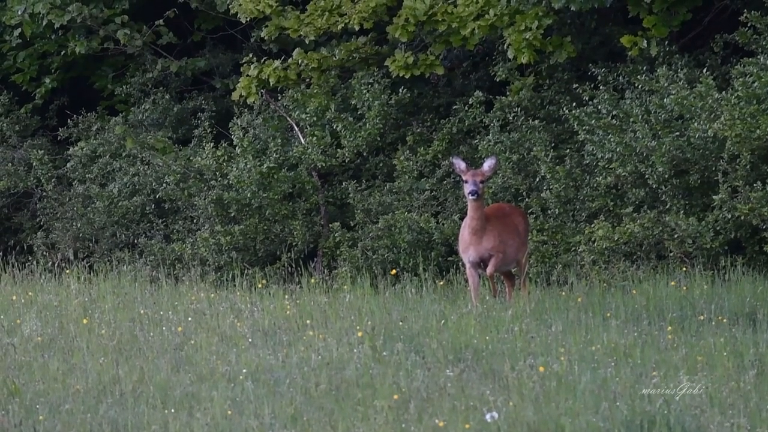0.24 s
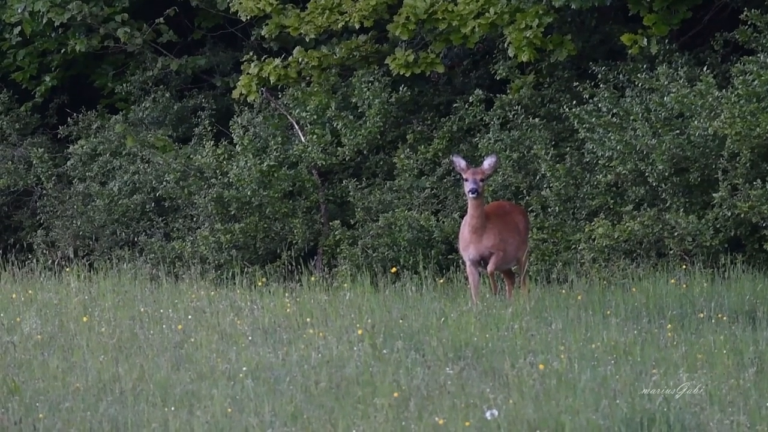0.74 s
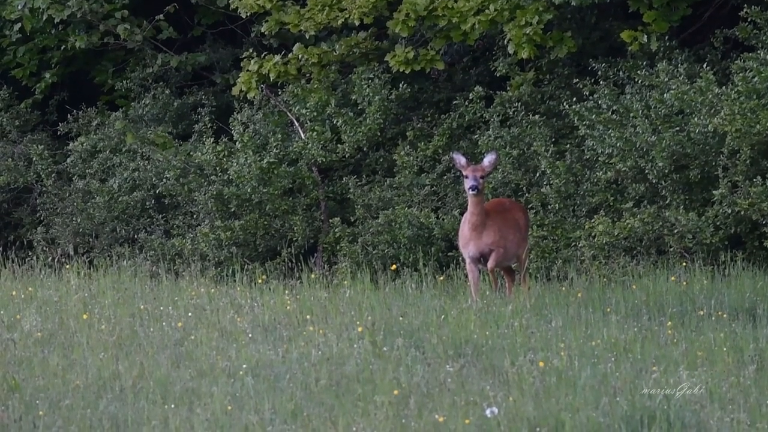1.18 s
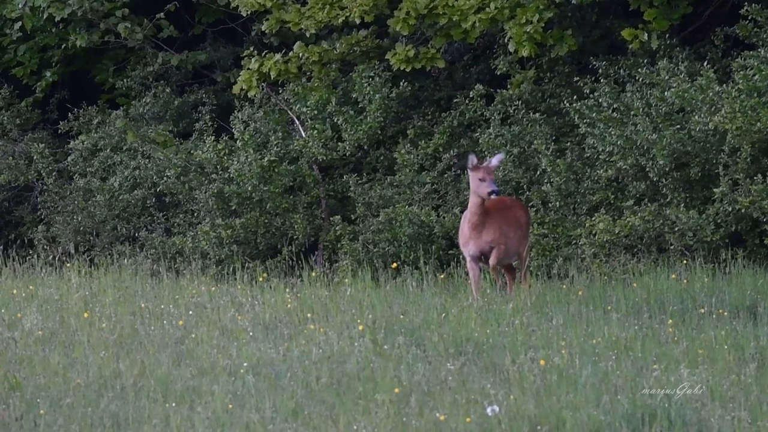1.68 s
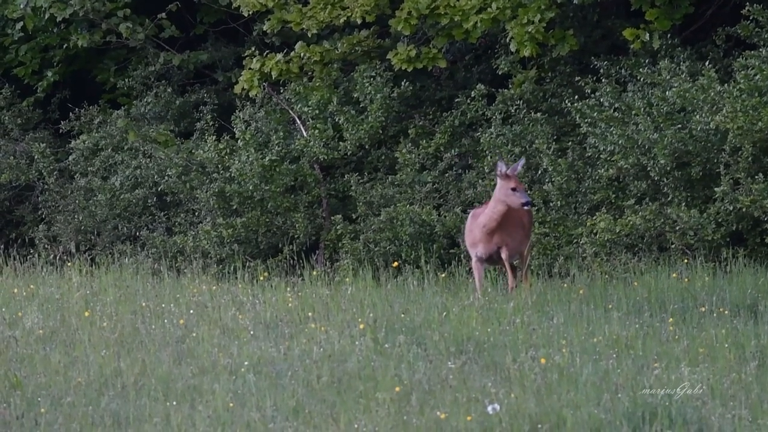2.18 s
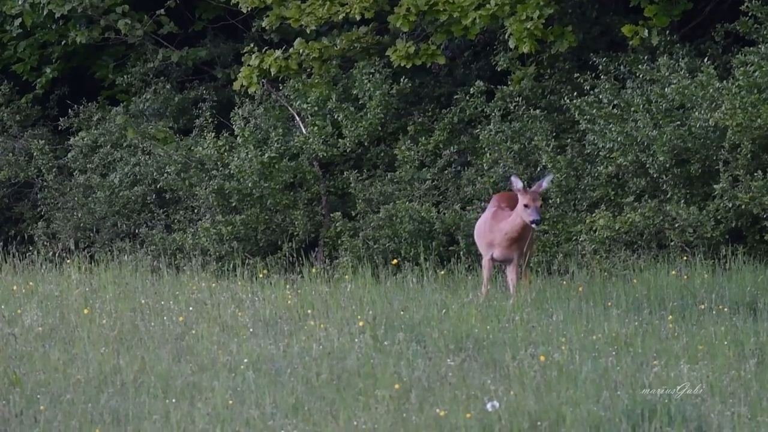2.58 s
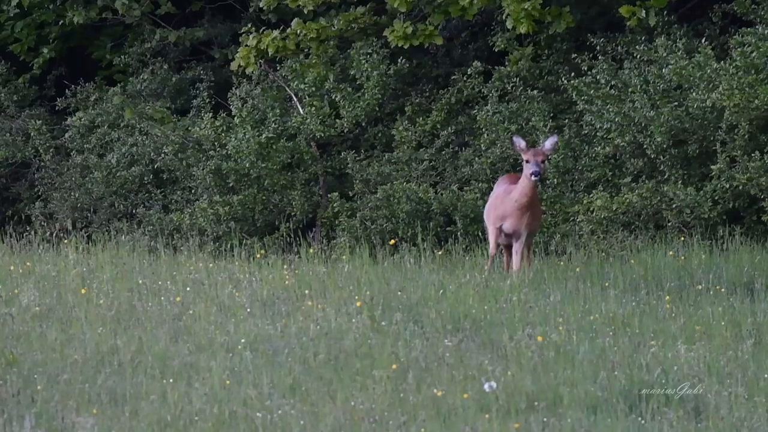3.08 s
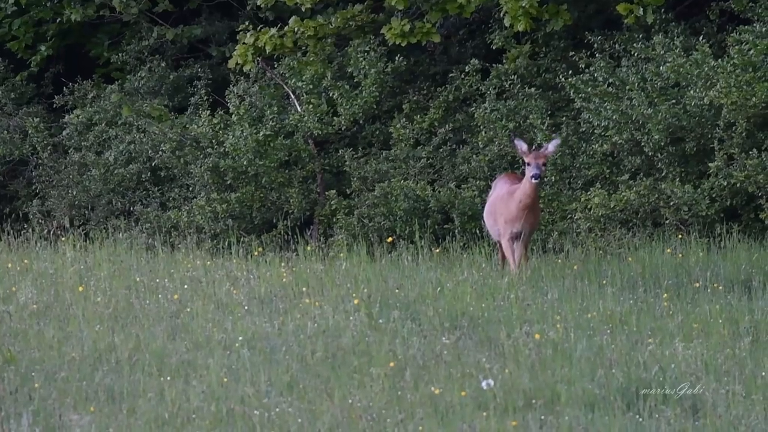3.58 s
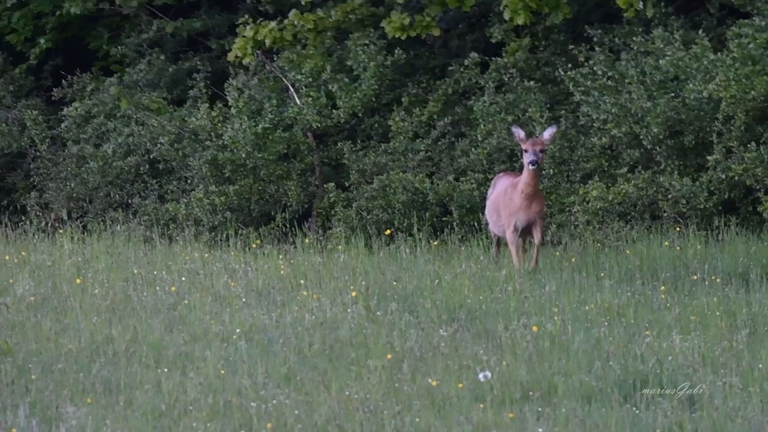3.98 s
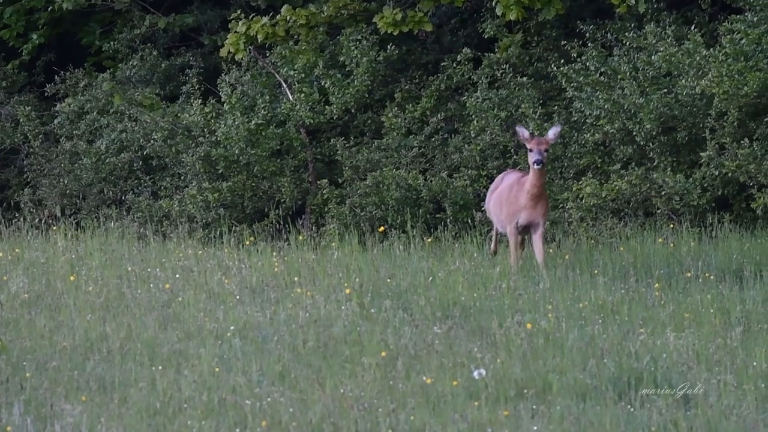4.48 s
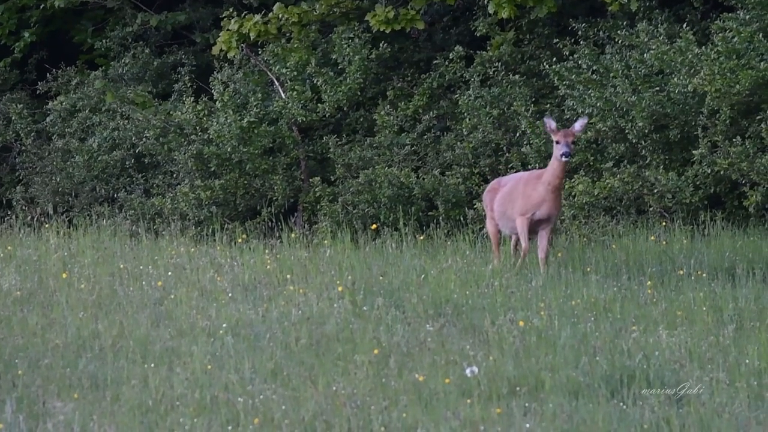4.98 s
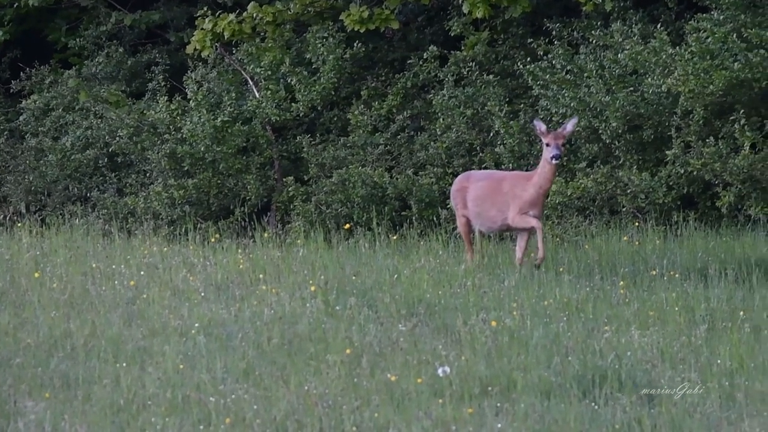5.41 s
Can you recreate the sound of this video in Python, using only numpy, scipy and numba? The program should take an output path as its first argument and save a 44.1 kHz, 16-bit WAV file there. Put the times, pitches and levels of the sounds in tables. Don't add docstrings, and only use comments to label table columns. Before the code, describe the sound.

Birds whistle and trill along a wood's edge, then a deer gives one loud hoarse bark that echoes dully among the trees.

```python
import sys
import numpy as np
from scipy import signal
from scipy.fft import rfft, irfft, next_fast_len
from scipy.io import wavfile
from scipy.ndimage import uniform_filter1d
from numba import njit

SR = 44100
rng = np.random.default_rng(int(sys.argv[2]) if len(sys.argv) > 2 else 0)


def makeup_ratio(level_db):
    decades = np.asarray(level_db, float) / 20
    return 10 ** decades


def master_out(mix):
    frames = np.transpose(np.atleast_2d(mix))
    ceiling = np.clip(frames, -1, 1)
    pcm = np.round(ceiling * 32767).astype(np.int16)
    wavfile.write(sys.argv[1], SR, pcm)


N = 249165
TIME = np.arange(N) / SR

# peak_at [share of length], glide_done by then [share], start_under_peak [dB], end_under_peak [dB]
EVEN = (0.63, .55, 2.1, 1.8)
SWELLING = (.85, 0.92, 5.5, 1)


def rms_one(x):
    return x / np.sqrt(np.mean(x ** 2) + 1e-20)


def at_hz(points, hz):
    table_hz, value = np.transpose(points)
    return np.interp(np.log(np.maximum(hz, 1)), np.log(table_hz), value)


def drift(rate_hz, size):
    r = np.exp(-2 * np.pi * rate_hz / SR)
    settle = 8000
    white = rng.standard_normal(size + settle)
    return rms_one(signal.lfilter([1], [1, -2 * r, r * r], white)[settle:])


def span(rows, fade_s):
    s, *columns = np.transpose(rows)
    at = slice(max(int(s[0] * SR), 0), min(int(s[-1] * SR), N))
    t = TIME[at]
    gate = np.clip(np.minimum(t - s[0], s[-1] - t) / fade_s, 0, 1)
    return at, [np.interp(t, s, c) for c in columns], np.sin(np.pi / 2 * gate) ** 2


def bands():
    edges = 20 * 2 ** np.arange(0, 10.5, .5)
    return [(np.sqrt(lo * hi), signal.butter(2, [lo, hi], "band", fs=SR, output="sos"))
            for lo, hi in zip(edges, edges[1:])]


def air(patchy_db):
    # pitch_hz [Hz], level_db [dB per Hz]
    spectrum_db = [(12, -38), (20, -8), (153, 0), (317, -5), (443, -4), (586, -7), (866, -5.5), (1280, -9),
                   (1950, -8.5), (3800, -11.5), (6290, -15.5), (7650, -22.5), (10400, -15.5), (14500, -19),
                   (15800, -17)]
    # pitch_hz [Hz], likeness [0..1]
    likeness = [(60, 0.81), (130, 0.43), (290, 0.4), (640, 0.058), (1400, 0.015), (15000, 0.01)]
    level_db = -51 - 5.5
    out = 0
    white = rng.standard_normal((2, 2, N))
    for k, (hz, sos) in enumerate(bands()):
        mid, side = signal.sosfilt(sos, white[k % 2])
        alike = at_hz(likeness, hz)
        coarse = TIME[::40]
        flicker = makeup_ratio(patchy_db * np.interp(TIME, coarse, drift(145, len(coarse))))
        out = out + flicker * (np.sqrt(1 + alike) * mid + np.sqrt(1 - alike) * side * [[1], [-1]])
    size = next_fast_len(N)
    colour = makeup_ratio(at_hz(spectrum_db, np.arange(size // 2 + 1) * SR / size))
    return makeup_ratio(level_db) * rms_one(irfft(rfft(out, size) * colour, size)[:, :N])


def placed(x, side, late):
    # pitch_hz [Hz], difference_db [dB]
    shadow = [(60, 2), (110, 3), (200, 0), (380, -1.5), (700, -1.5), (1290, -6.5), (2380, -7), (4400, -5),
              (8120, -5.5), (15000, -8)]
    # pitch_hz [Hz], lead [radians]
    port_phase = [(0, 0), (1030, 1.35), (2240, 1.9), (3300, 2.7), (4300, 4.5), (5860, 5.7), (16000, 12)]
    size = next_fast_len(N + 2000)
    hz = np.arange(size // 2 + 1) * SR / size
    half = makeup_ratio(side * at_hz(shadow, hz) / 2)
    lag = np.exp(-1j * late * np.interp(hz, *np.transpose(port_phase)))
    spectrum = rfft(x, size)
    return irfft([spectrum * half * lag, spectrum / half], size)[:, :N]


def wood(x, onset_s, side, spread):
    # pitch_hz [Hz], t60_s [s]
    trees = [(200, 1), (700, 0.83), (1400, 0.75), (2300, 0.52), (4000, 0.7), (8000, 0.14)]
    # t60_factor [ratio], level_db [dB]
    far_trees = (2.9, -6)
    far_factor, far_db = far_trees
    t = np.arange(2 * SR) / SR
    white = rng.standard_normal((2, 2, len(t)))
    echo = 0
    for k, (hz, sos) in enumerate(bands()):
        fall_db = -60 * t / at_hz(trees, hz)
        decay = makeup_ratio(fall_db) + makeup_ratio(far_db + fall_db / far_factor)
        echo = echo + signal.sosfilt(sos, white[k % 2]) * decay
    echo = echo * (1 - np.exp(-t / onset_s)) / np.sqrt(SR / 10)
    ahead, around = signal.fftconvolve(echo, x[None], axes=1)[:, :N]
    return placed(ahead, side, late=0.83) + spread * placed(around, side, late=0) * [[1], [-1]]


def sung(notes, shape):
    peak, done, rise_db, fall_db = shape
    return [[(s, a, db - rise_db), (s + peak * length, a + done * (b - a), db), (s + length, b, db - fall_db)]
            for s, length, a, b, db in notes]


def whistles(notes, blur_hz, blur, fade_s):
    out = np.zeros(N)
    for rows in notes:
        at, (hz, level_db), gate = span(rows, fade_s)
        phase = 2 * np.pi * np.cumsum(hz) / SR
        in_step, across = drift(blur_hz, len(gate)), drift(blur_hz, len(gate))
        tone = (1 + blur * in_step) * np.sin(phase) + blur * across * np.cos(phase)
        out[at] += np.sqrt(2 / (1 + 2 * blur ** 2)) * makeup_ratio(level_db) * gate * tone
    return out


def drone_and_crickets():
    # start_s [s], length_s [s], from_hz [Hz], to_hz [Hz], peak_db [dB]
    drone = [
        (1.3, .92, 280.5, 265.5, -64),
        (5.06, 0.15, 72.5, 66, -63),
    ]
    # time_s [s], centre_hz [Hz], level_db [dB]
    crickets = [(0, 6190, -83), (5.65, 6240, -81.5)]
    return whistles(sung(drone, (.4, 0.388, 6.7, 9.6)) + [crickets], blur_hz=31, blur=4.8, fade_s=0.074)


def far_chorus():
    # start_s [s], length_s [s], from_hz [Hz], to_hz [Hz], peak_db [dB]
    buzzes = [
        (2.03, 0.23, 3754, 3700, -55),
        (2.85, .11, 5270, 5140, -58.5),
        (2.97, .43, 4230, 4045, -60.5),
        (4.565, 0.059, 5420, 5080, -59.5),
    ]
    chorus = [
        (0, 0.17, 4070, 4250, -67),
        (4.052, .45, 2880, 2907, -68),
        (4.946, 0.353, 3385, 3425, -63.5),
        (5.052, .12, 5413, 5270, -63.5),
    ]
    return whistles(sung(buzzes + chorus, (.4, .5, 6, 4.9)), blur_hz=380, blur=3, fade_s=.015)


def falling_rasps():
    # length_s [s], from_hz [Hz], to_hz [Hz], peak_db [dB]
    rasp = (0.08, 5521, 5150, -60.5)
    # start_s [s], length_s [s], from_hz [Hz], to_hz [Hz], peak_db [dB]
    strays = [
        (.47, 0.067, 4260, 3900, -63),
        (1.44, 0.036, 5780, 5430, -62.5),
        (0.419, 0.044, 4480, 4720, -55),
        (2.75, .04, 7700, 7650, -73),
        (2.835, 0.031, 6170, 5200, -65),
        (5.3, 0.011, 5800, 5170, -61),
    ]
    first_s, every_s = .048, .152
    row = [(first_s + every_s * k, *rasp) for k in range(4)]
    return whistles(sung(row + strays, EVEN), blur_hz=260, blur=1, fade_s=.006)


def clear_bird():
    # start_s [s], length_s [s], from_hz [Hz], to_hz [Hz], peak_db [dB]
    clear_notes = [
        (4.9, 0.065, 3301, 3330, -62),
        (5.05, 0.06, 3150, 3130, -65),
        (5.35, 0.11, 3810, 3860, -54.5),
        (5.31, .03, 4620, 4280, -61),
        (5.335, .035, 4280, 4350, -59),
        (5.567, 0.02, 4930, 4570, -48.5),
        (5.58, 0.041, 4580, 4470, -49),
    ]
    return whistles(sung(clear_notes, (.4, 0.47, 6.6, 3.5)), blur_hz=40, blur=.12, fade_s=.005)


def chipping_bird():
    # start_s [s], length_s [s], from_hz [Hz], to_hz [Hz], peak_db [dB]
    calls = [
        (1.895, 0.016, 3140, 3230, -51),
        (3.08, 0.02, 2710, 2920, -56.5),
        (3.12, .02, 1430, 1390, -60),
        (3.98, 0.019, 1320, 1350, -65),
        (4.12, 0.022, 1320, 1400, -65),
        (4.3, 0.043, 3680, 3270, -60),
        (4.34, 0.091, 3310, 3340, -63),
        (5.015, 0.026, 6050, 5400, -65.5),
    ]
    return whistles(sung(calls, EVEN), blur_hz=50, blur=0.3, fade_s=0.0022)


def robin_song():
    # start_s [s], length_s [s], from_hz [Hz], to_hz [Hz], peak_db [dB]
    thin_notes = [
        (2.62, 0.24, 8240, 7720, -66.5),
        (2.78, 0.12, 7480, 7290, -63.5),
        (2.905, .16, 4706, 4674, -55),
        (3.48, 0.19, 7300, 6720, -67),
        (3.57, .25, 6770, 6520, -58.5),
        (3.755, 0.19, 4345, 4370, -54),
        (3.9, .42, 4440, 4392, -56),
    ]
    return whistles(sung(thin_notes, (.3, .5, 7, 10)), blur_hz=91, blur=0.64, fade_s=0.0027)


def thrush_song():
    # start_s [s], length_s [s], from_hz [Hz], to_hz [Hz], peak_db [dB]
    dying = [(1.8, .2, 2110, 2007, -72), (2.29, 0.06, 1968, 1812, -55.5), (2.455, 0.047, 1852, 1845, -53),
             (2.58, .14, 1736, 1665, -65), (2.75, .09, 2240, 2260, -63), (2.85, 0.066, 1924, 1906, -58),
             (2.88, .025, 2460, 2310, -61), (3.35, 0.2, 2790, 2780, -64.5), (3.6, 0.082, 2418, 2480, -58.5),
             (3.73, 0.049, 2480, 2430, -66), (5.46, 0.038, 3100, 3220, -68)]
    swells = [
        (2.245, 0.049, 2117, 1982, -55),
        (2.51, 0.046, 1758, 1734, -56),
        (2.645, 0.099, 2368, 2115, -54),
        (3.22, .12, 1974, 2150, -67),
        (4.4, 0.039, 2390, 2470, -68.5),
    ]
    notes = sung(dying, (.2, 0.286, 2.1, 10)) + sung(swells, SWELLING)
    return whistles(notes, blur_hz=91, blur=0.46, fade_s=0.0043)


def warbler_song():
    # start_s [s], length_s [s], from_hz [Hz], to_hz [Hz], peak_db [dB]
    even_notes = [(.008, 0.1, 2403, 3150, -47), (.153, 0.026, 2397, 2270, -45),
                  (.24, 0.036, 3790, 3560, -45), (.27, 0.054, 3510, 3600, -50),
                  (.242, .085, 3800, 3910, -51), (.37, 0.087, 3400, 3187, -48),
                  (.49, .04, 3270, 3340, -47.5), (.527, 0.034, 3300, 3650, -45.5),
                  (.56, 0.027, 3647, 3440, -45), (.6, 0.047, 3550, 3260, -52.5),
                  (.685, 0.019, 4050, 3830, -52), (.835, 0.023, 3670, 3450, -43),
                  (1.008, 0.037, 2115, 2890, -46), (1.048, 0.025, 3200, 3150, -45),
                  (1.075, 0.021, 2800, 2380, -46), (1.093, 0.043, 2400, 2250, -44.5),
                  (1.062, 0.025, 3810, 4370, -55), (1.185, .042, 3240, 3064, -43),
                  (1.355, .035, 3030, 3090, -49), (1.44, 0.084, 2144, 1930, -56),
                  (1.51, .03, 3500, 3300, -55), (1.56, 0.051, 3000, 3040, -58),
                  (1.665, 0.011, 3930, 3700, -59)]
    fades = [
        (.308, .037, 3250, 2220, -54),
        (.41, 0.066, 4600, 4555, -54.5),
        (.71, 0.087, 3730, 3900, -55),
        (.86, 0.13, 3450, 3400, -40.5),
        (1.322, .03, 2207, 2960, -43),
        (1.415, 0.11, 3060, 3017, -53.5),
        (1.635, .03, 3250, 3800, -50.5),
    ]
    swells = [
        (.185, 0.053, 3770, 3780, -50),
        (1.13, 0.026, 4000, 3660, -50),
        (1.393, 0.0324, 2940, 2370, -46),
        (1.355, .035, 4720, 3970, -54),
    ]
    trills = [(.33, .18, 3680, 3550, -52.5), (.6, 0.097, 3600, 3700, -59), (.84, .18, 3880, 3800, -61.5),
              (.04, 0.091, 2540, 2750, -62), (1.1, .2, 2780, 2690, -63), (.26, 0.11, 3600, 3510, -51),
              (.57, 0.096, 3500, 3490, -50), (.7, 0.16, 3800, 3960, -52), (1.07, .095, 3790, 3750, -49.5),
              (1.33, 0.021, 3900, 4230, -52), (1.55, 0.032, 3700, 4030, -53.5),
              (1.66, 0.054, 3720, 3590, -55.5), (5.2, .1, 3200, 3420, -64)]
    fading = (.15, .2, 2, 10)
    song = sung(even_notes, EVEN) + sung(fades, fading) + sung(swells, SWELLING)
    quick = sung(trills, (0.02, -0.2, 0, 5.5))
    return (whistles(song, blur_hz=77, blur=0.38, fade_s=0.0027)
            + whistles(quick, blur_hz=236, blur=2.2, fade_s=0.015))


def chest_course():
    start_s, length_s = 4.588, .347
    pitch_hz, sag_hz = 211.2, 48.08
    level_db, loss_db = -47.5, 12
    gone = np.linspace(0, 1, num=12)
    return np.transpose([start_s + length_s * gone, pitch_hz - sag_hz * gone ** 2, level_db - loss_db * gone])


def chest_tone():
    return whistles([chest_course()], blur_hz=70, blur=.28, fade_s=.015)


@njit
def resonance(x, hz, r, rate):
    y = np.zeros(len(x))
    for i in range(2, len(x)):
        turn = 2 * r * np.cos(2 * np.pi * hz[i] / rate)
        y[i] = x[i] - x[i - 2] + turn * y[i - 1] - r * r * y[i - 2]
    return y


def bark(jitter, breath):
    # time_s [s], level_db [dB]
    effort = [
        (4.556, -67),
        (4.578, -34),
        (4.61, -29.5),
        (4.71, -32.5),
        (4.77, -37),
        (4.83, -35.5),
        (4.92, -45.5),
        (4.945, -47),
    ]
    # time_s [s], lift_db [dB]
    surges = [
        (4.584, 0),
        (4.612, 1),
        (4.642, -6),
        (4.664, 2),
        (4.684, -1.5),
        (4.76, 2.5),
        (4.7, 1.5),
        (4.892, 1.5),
    ]
    # time_s [s], first_hz [Hz], second_hz [Hz], third_hz [Hz], fourth_hz [Hz]
    mouth = [
        (4.56, 680, 1420, 2290, 3650),
        (4.7, 720, 1470, 2220, 3650),
        (4.82, 695, 1410, 2080, 3600),
        (4.94, 640, 1290, 2000, 3500),
    ]
    # core_hz [Hz], skirt_hz [Hz]
    widths_hz = [(170, 370), (170, 340), (260, 650), (800, 1500)]
    # pitch_hz [Hz], width_hz [Hz], level_db [dB]
    loose_air = (280, 160, -25)
    # easy_db [dB], easy_rel_db [dB], loss [dB per dB]
    first_rule = (-42.5, 5.7, 1)
    third_rule = (-40.5, -0.72, 0.49)
    surge_half_s = 0.0068

    at, (level_db,), gate = span(effort, fade_s=0.0026)
    t, size = TIME[at], len(gate)

    s, pitch_hz, _ = chest_course().T
    cycles = np.cumsum(np.interp(t, s, pitch_hz) * np.exp(jitter * drift(150, size))) / SR
    slap = np.diff(np.floor(cycles), prepend=0) > 0
    pulses = rms_one(slap * makeup_ratio(2.1 * rng.standard_normal(size)))
    hiss = rms_one(rng.standard_normal(size) * np.exp(-1.5 * (cycles % 1)))
    source = pulses + breath * hiss
    lift_db = sum(db * np.exp(-.5 * ((t - peak_s) / surge_half_s) ** 2) for peak_s, db in surges)

    air_hz, air_width_hz, air_db = loose_air
    loose = resonance(hiss, np.full(size, float(air_hz)), np.exp(-np.pi * air_width_hz / SR), SR)
    throat = makeup_ratio(air_db) * rms_one(loose)
    first_db, third_db = [rel_db - loss * np.maximum(level_db - easy_db, 0)
                          for easy_db, rel_db, loss in (first_rule, third_rule)]
    mouth_s, *centres = np.transpose(mouth)
    for k, rel_db in enumerate([first_db, 0, third_db, -23]):
        hz = np.interp(t, mouth_s, centres[k])
        core, skirt = np.exp(-np.pi * np.array(widths_hz[k]) / SR)
        twice = resonance(resonance(source, hz, core, SR), hz, skirt, SR)
        twice = twice / np.sqrt(uniform_filter1d(twice ** 2, size=1300))
        throat = throat + (-1) ** k * makeup_ratio(rel_db) * twice
    out = np.zeros(N)
    out[at] = throat * makeup_ratio(level_db + lift_db) * gate
    return out


def scene():
    deer, chest = bark(jitter=.3, breath=2.2), chest_tone()
    warbler, thrush, robin = warbler_song(), thrush_song(), robin_song()
    chips, clear, rasps = chipping_bird(), clear_bird(), falling_rasps()
    chorus, low = far_chorus(), drone_and_crickets()

    direct = placed(deer + chest, side=1.03, late=0.99)
    direct += placed(warbler, side=1.62, late=1)
    direct += placed(thrush, side=2.36, late=1)
    direct += placed(robin, side=1.9, late=0.18)
    direct += placed(chips, side=-1.25, late=-0.95)
    direct += placed(clear + chorus, side=0.41, late=0.29)
    direct += placed(rasps + low, side=.1, late=0)

    birds = makeup_ratio(-6) * warbler + makeup_ratio(3.5) * thrush + makeup_ratio(0.5) * robin + makeup_ratio(-0.5) * chorus
    birds += makeup_ratio(-12) * (chips + clear + rasps)
    birds_echo = wood(makeup_ratio(-.5) * birds, onset_s=.012, side=.6, spread=1.1)
    bark_echo = wood(makeup_ratio(-5.5) * deer, onset_s=0.057, side=1, spread=0.55)
    return direct + bark_echo + birds_echo + air(patchy_db=0.95)


def band_limit(x):
    return signal.sosfilt(signal.butter(12, 15780, fs=SR, output="sos"), x)


def record(dry):
    miked = signal.sosfilt(signal.butter(2, 38, "high", fs=SR, output="sos"), dry)
    return band_limit(miked)


dry = scene()
out = record(dry)
master_out(out)
```